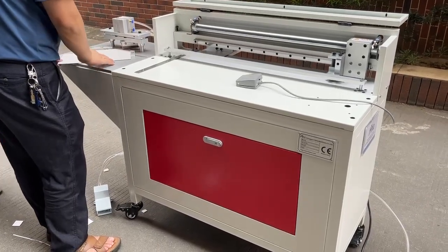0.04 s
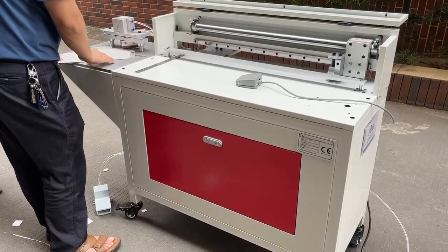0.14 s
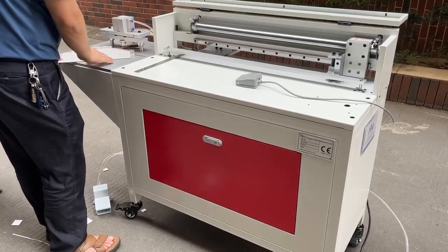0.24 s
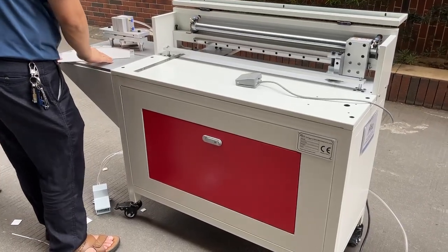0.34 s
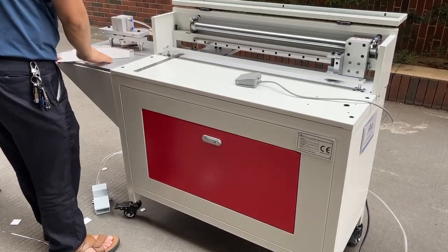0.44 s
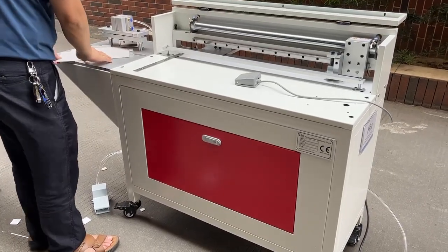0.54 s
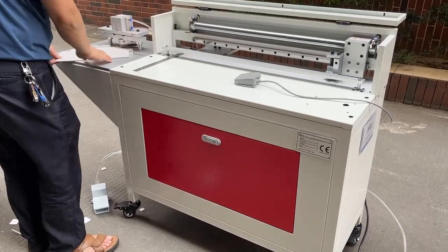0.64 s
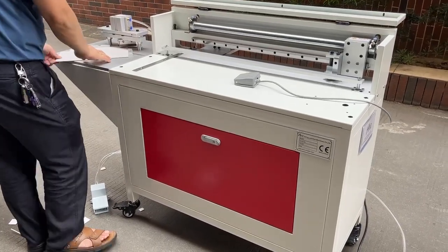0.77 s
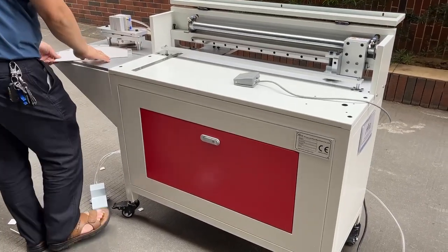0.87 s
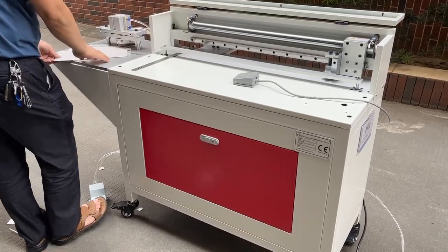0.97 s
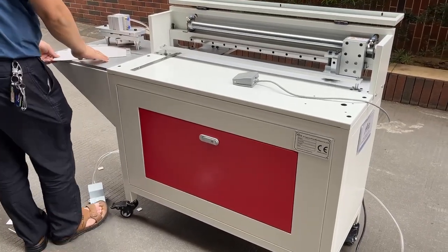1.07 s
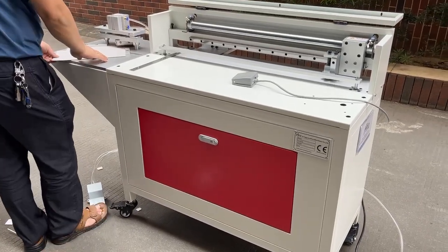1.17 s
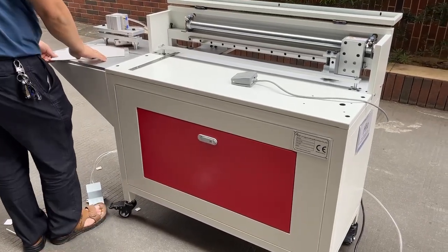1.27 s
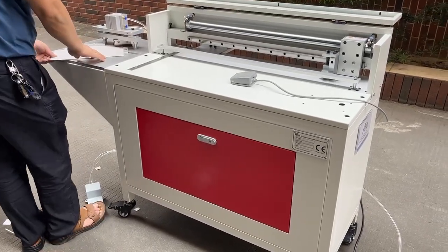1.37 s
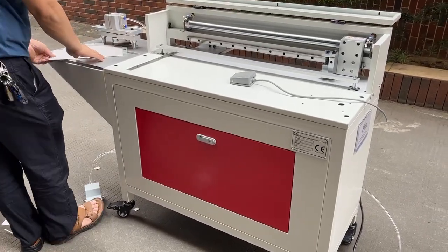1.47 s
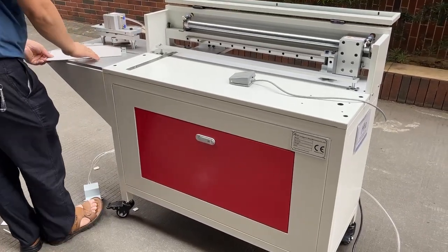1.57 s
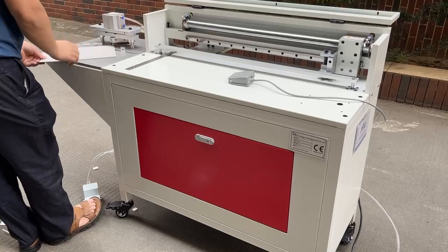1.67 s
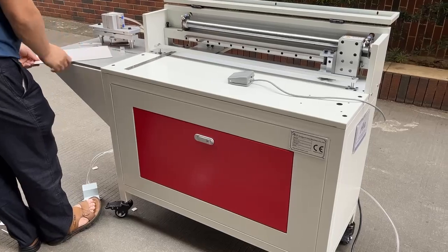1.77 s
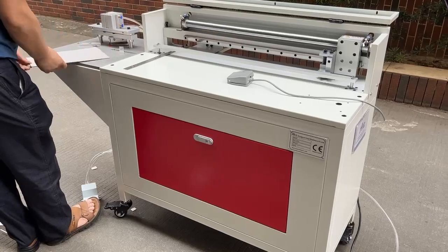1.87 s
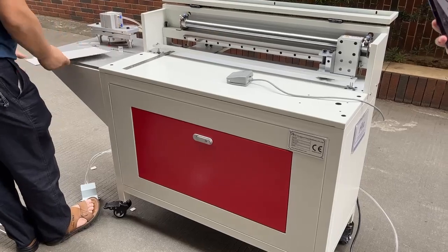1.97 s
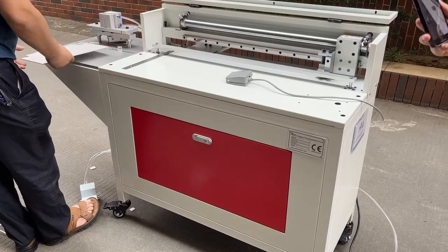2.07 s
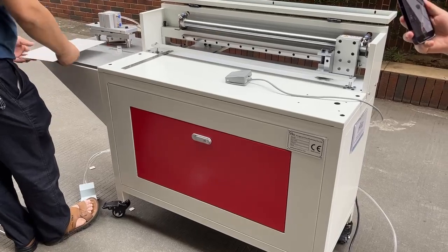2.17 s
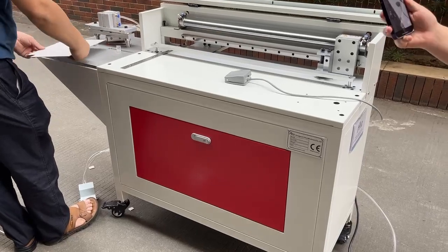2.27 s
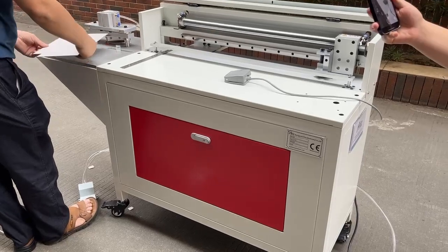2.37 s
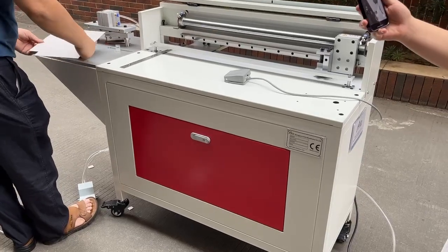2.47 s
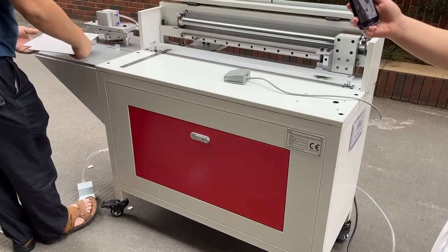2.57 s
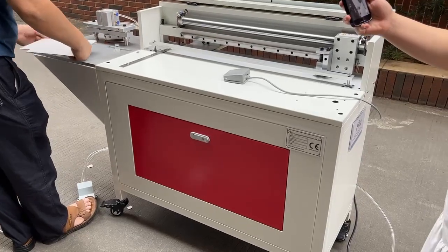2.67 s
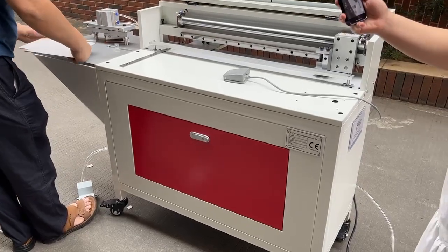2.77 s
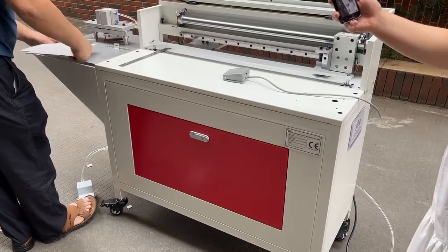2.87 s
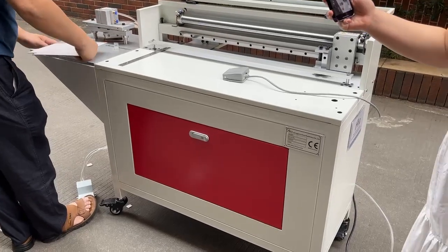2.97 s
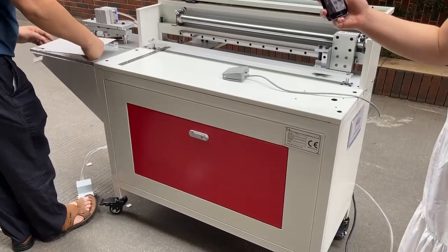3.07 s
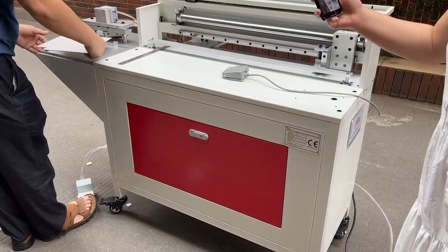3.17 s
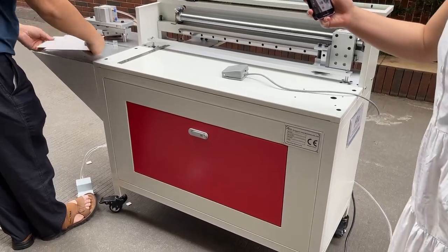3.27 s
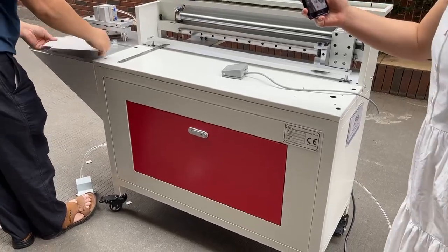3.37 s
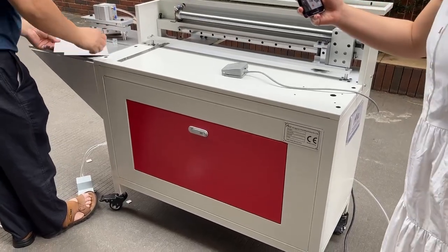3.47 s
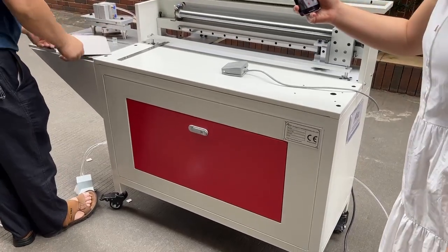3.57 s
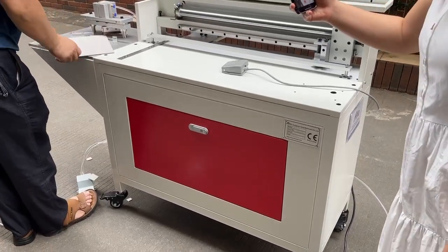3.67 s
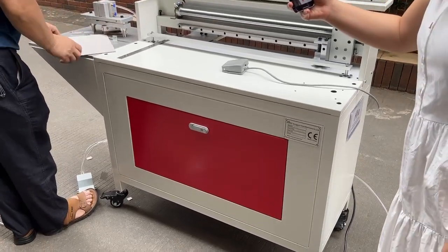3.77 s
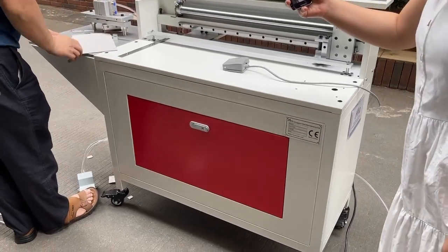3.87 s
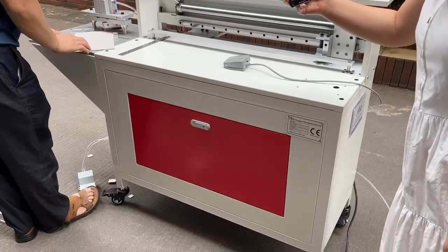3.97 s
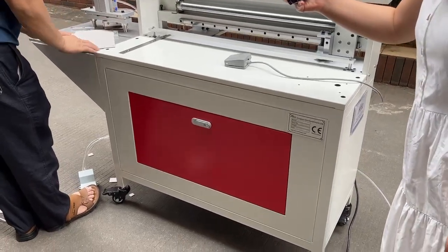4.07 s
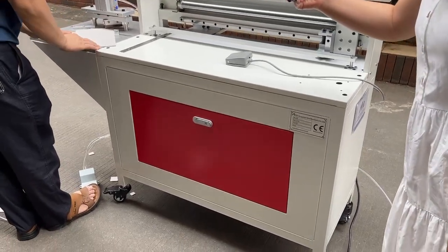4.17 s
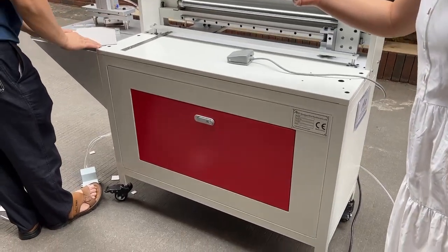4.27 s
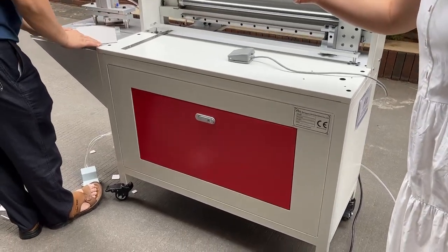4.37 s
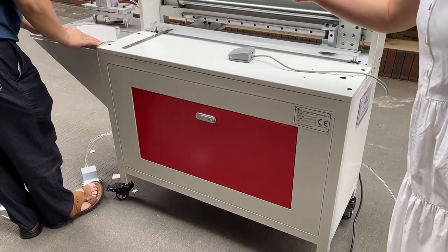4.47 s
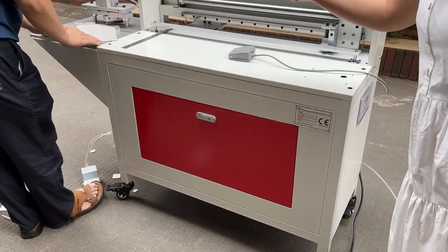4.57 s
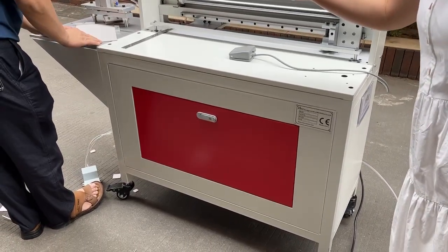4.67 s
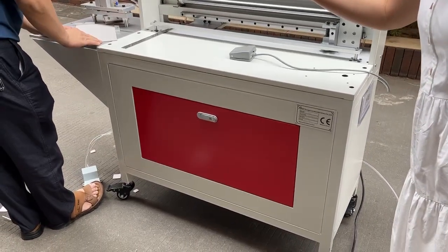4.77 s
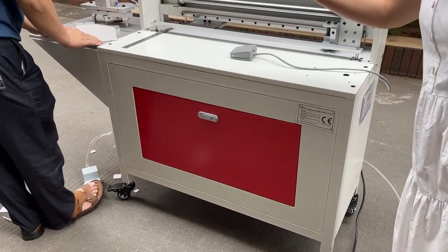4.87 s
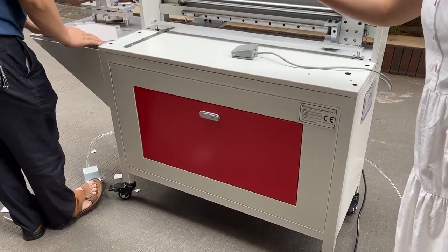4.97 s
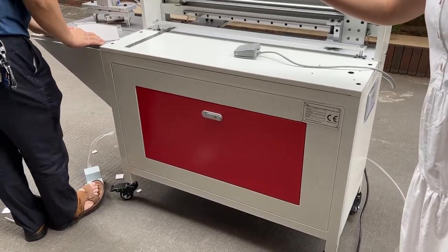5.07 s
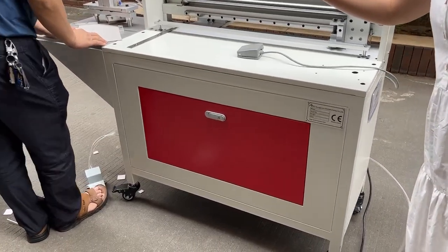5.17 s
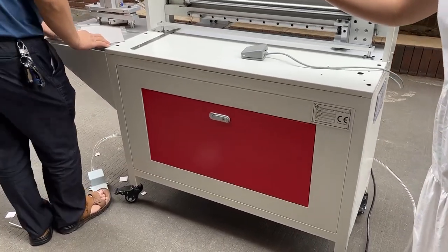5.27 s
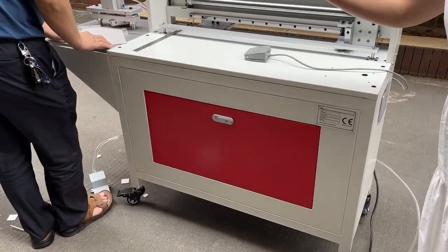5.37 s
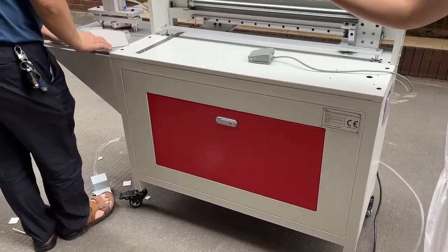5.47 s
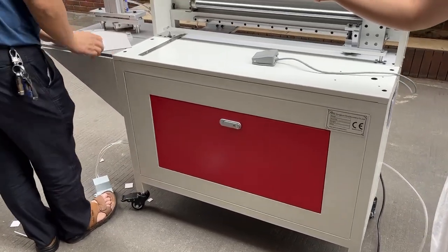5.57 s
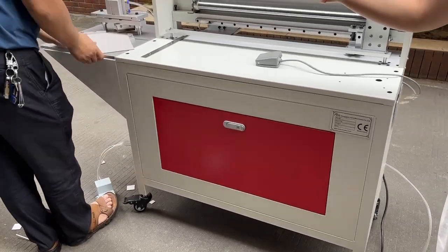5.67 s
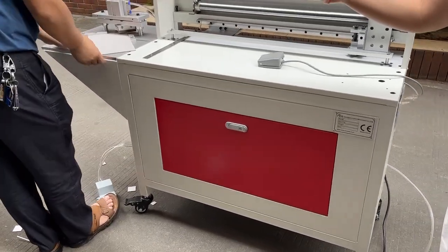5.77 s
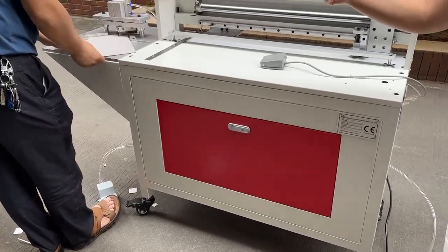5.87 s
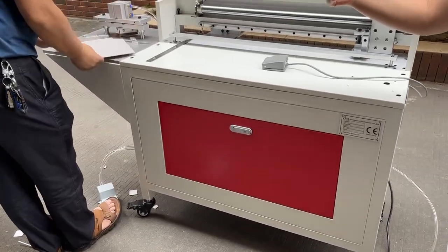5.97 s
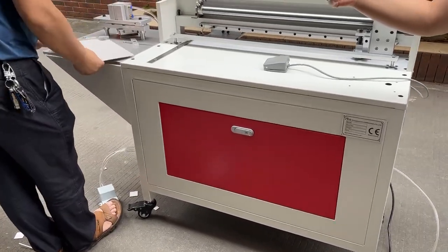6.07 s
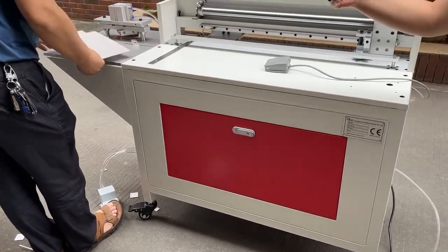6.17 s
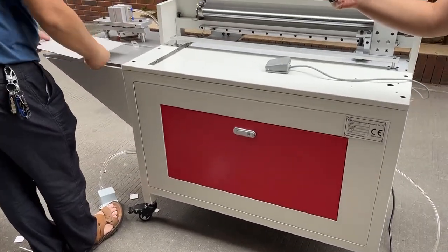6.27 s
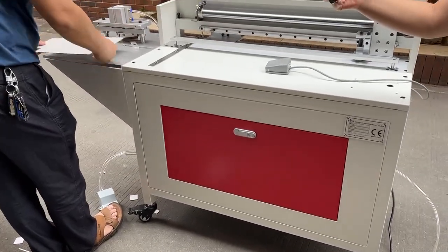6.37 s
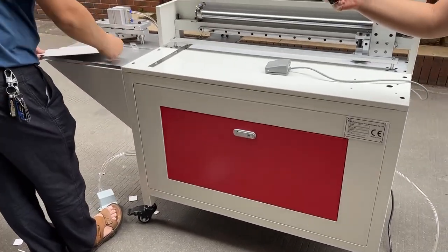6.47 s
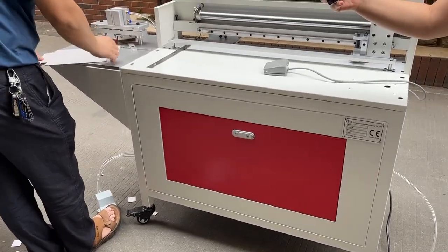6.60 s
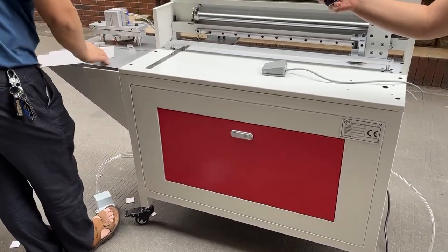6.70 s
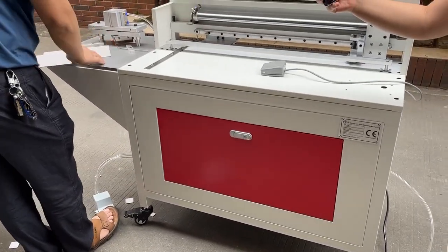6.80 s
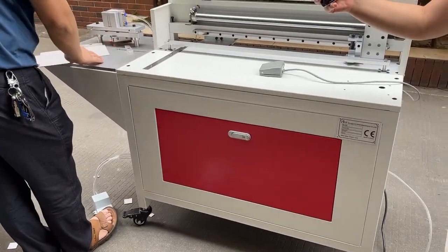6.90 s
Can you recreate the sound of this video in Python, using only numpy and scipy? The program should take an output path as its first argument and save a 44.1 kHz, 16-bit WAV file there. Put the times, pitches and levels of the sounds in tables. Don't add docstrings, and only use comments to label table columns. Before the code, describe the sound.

Over a steady beating compressor hum and airy fan, a pneumatic cutter makes two strokes: puff, dull thud, hiss, then a sharp loud metal clank.

```python
import sys
import numpy as np
from scipy import signal
from scipy.fft import rfft, irfft, next_fast_len
from scipy.io import wavfile
from scipy.ndimage import uniform_filter1d, map_coordinates

SR = 44100
rng = np.random.default_rng(int(sys.argv[2]) if len(sys.argv) > 2 else 0)


def dump_mix(stems):
    frames = np.atleast_2d(stems).T
    limited = np.clip(frames, -1, 1)
    pcm = np.round(limited * 32767).astype(np.int16)
    wavfile.write(sys.argv[1], SR, pcm)


def volts_from_decibels(level):
    exponent = np.asarray(level, float) / 20
    return 10 ** exponent


N = 306054
TIME = np.arange(N) / SR

# crank speed in Hz, crank angle in turns at 3.5 s.
HEADS = [(23.5775, 0), (23.7041, .815), (23.7767, .629), (23.8183, .79)]
HEAD_DB = [0, 0, 0, -1]
HEAD_TILT_DB = [-2.1, 0.55, 0.79, 0.85]
# crank order, level in dB.
STROKE_ORDERS = [(2, -60.5), (4, -57.5), (6, -49.5), (7, -66.5), (8, -56), (9, -59), (10, -65.5),
                 (13, -67.5), (15, -66.5)]
# crank order, level in dB.
WHINE_ORDERS = [(19, -55), (37, -62), (39, -69.5), (41, -60.5), (43, -61), (45, -62.5)]
# frequency in Hz, density in dB per Hz.
ROAR_SPECTRUM = [(25, -23), (45, 3), (100, -3.5), (250, -9), (450, -8.5), (600, -11), (780, -11.5),
                 (1100, -12), (1700, -15), (2100, -23.5), (8000, -93)]
# frequency in Hz, width in Hz, lift in dB.
CASING_MODES = [(451, 13, 5), (565, 22, 8.5), (960, 56, 3.5)]
# frequency in Hz, density in dB per Hz.
FAN_SPECTRUM = [(1200, -30), (2000, -7.5), (2700, 0), (4100, -4), (4800, -3.5), (5800, -6.5), (6900, -10),
                (8200, -10), (10300, -18), (11700, -19), (12000, -68)]
# frequency in Hz, width in Hz, lift in dB.
COWL_MODES = [(2550, 86, 1), (3260, 64, 3), (5210, 550, 1.5), (5520, 250, 2)]
# time in seconds, compressor gain in dB.
NEARNESS = [(0, 1.5), (.6, 1.5), (1.5, 2.5), (3.5, 0.5), (5.8, 2), (6.94, -0.5)]
# peak in seconds, level in dB, colour in Hz, length in seconds.
TICKS = [(0.106, -39, 990, 0.01), (0.553, -45, 2990, 0.012), (2.08, -61, 1020, 0.0077),
         (2.698, -36.5, 2780, 0.012), (3.485, -35.5, 1370, 0.012), (5.484, -41, 1750, 0.01),
         (6.5227, -24, 2850, 0.0067)]
# start in seconds, level in dB, drain time factor, treble tilt in dB per octave.
PEDAL = [
    (1.038, -0.5, 0.92, 1),
    (1.4214, 1.1, 0.67, -0.3),
    (5.119, -2, 0.97, 1),
    (5.538, -0.6, 1.4, -1.6),
]
# delay in seconds, rms in dB, rise in seconds, hold in seconds, t60 in seconds.
FILL_JETS = [
    (0, -26.5, 0.0084, 0.018, 0.084),
    (0.041, -23.5, 0.018, 0.011, 0.089),
]
# delay in seconds, rms in dB, rise in seconds, hold in seconds, t60 in seconds.
VENT_JETS = [
    (-.009, -23.5, 0.011, 0.036, 0.2),
    (0, -18.5, 0.012, 0.0018, 0.17),
]
# frequency in Hz, density in dB per Hz.
JET_SPECTRUM = [(300, -28), (900, -9.5), (1600, -9), (2900, -8.5), (4300, -6.5), (5600, -11.5),
                (6500, -9.5), (7300, -8.5), (8800, -7), (10000, -7), (11500, -13.5), (12450, -71)]
# frequency in Hz, t60 in seconds.
YARD_DECAY = [(300, 0.41), (1500, 1), (4000, 0.5), (10000, 0.37)]
# start in seconds, peak in dB, knock
# in Hz, ring length factor, knock over ring in dB.
BLOWS = [(1.097, -22, 1850, 1.1, -4), (1.118, -19, 281, 0.66, 2), (1.146, -26.5, 207, 0.63, 6.5),
         (1.185, -22, 215, 1.2, -2.5), (1.208, -35, 560, 1.5, -2), (1.48, -16, 1760, 0.15, 3),
         (1.4869, -8, 1685, 1.7, 12.5), (1.488, -13.5, 570, 0.19, 7.5), (5.125, -26, 1120, 1.6, 10),
         (5.197, -20.5, 280, 1.15, 5.5), (5.272, -16.5, 1110, 0.84, 1), (5.611, -6, 2060, 1.67, 2),
         (5.6146, -9, 3260, 0.25, 5), (5.754, -48, 1290, .46, -9), (6.524, -34.5, 1110, .1, 13),
         (1.4899, -16.5, 3200, 0.31, 9)]
# frequency in Hz, level in dB, t60 in seconds.
STEEL_MODES = [(188.2, -4.5, 0.48), (269, 0, 0.2), (362.7, -7, 0.73), (435, -3, 0.33), (547, -15.5, 0.96),
               (610, 3, 0.059), (670, -8, 0.046), (800, -21, 0.18), (946, 8.5, 0.093), (1150, 0.5, 0.18),
               (1370, -5, 0.35), (1710, 15.5, 0.063), (1844, 2.5, 0.27), (2050, 10, 0.14),
               (2740, 16, 0.065), (2745, 2, 0.17), (3030, -30, .12)]
# frequency in Hz, t60 in seconds.
RATTLE_DECAY = [(80, 0.89), (250, 1), (600, 0.24), (1500, 0.61), (3000, 0.5), (6000, 0.11), (11000, .3)]
# start in seconds, length in seconds, rms in dB, t60 in seconds.
CUTS = [
    (1.125, 0.14, -37, 1),
    (5.17, 0.18, -39.5, 0.89),
    (1.497, 0.031, -29.5, 0.6),
    (5.63, 0.027, -38.5, 1),
]
# peak in seconds, level in dB, pitch in Hz, half length in seconds.
BOOMS = [(1.161, -29, 73.5, 0.024), (1.24, -20.5, 90.6, 0.057), (1.409, -36, 97, 0.045),
         (1.553, -27.5, 84, 0.034), (1.716, -27, 100.4, 0.094), (5.26, -22, 87, 0.015),
         (5.328, -21, 92.5, 0.042), (5.673, -16.5, 79.6, 0.019), (5.734, -23.5, 88.7, 0.031),
         (5.827, -29.5, 93, 0.023)]
# frequency in Hz, likeness from 0 to 1, left over right in dB.
NEAR_PORTS = [(250, 1, 0.6), (1000, 0.42, 6), (1590, 0.7, -3.5), (1900, 0.8, 3), (3200, 0.45, 3),
              (5350, 0.1, 4), (7960, 1, -1.2), (11500, 0.87, 1)]
# frequency in Hz, likeness from 0 to 1, left over right in dB.
FAR_PORTS = [(120, 1, 0), (402, 0.55, 3), (960, 0.069, 0), (1540, 0.17, -4.5), (1870, 0.71, 0.5),
             (3200, 0.47, 0.5), (5320, 0.15, 7), (8210, 0.79, -1.7)]
# frequency in Hz, lead of right in radians.
PORT_LEAD = [(0, 0), (1000, -.8), (1600, -1.7), (1900, -.3), (5200, -.8), (7600, 3), (9000, 3.3),
             (10900, 2 * np.pi)]
# frequency in Hz, power share of the band mean.
FAINT_SHARE = [(500, 0), (1500, .25), (5000, .15), (7000, .8), (10000, 1.2)]

SHAFT_HZ, MAINS_HZ, MAINS_DB = 23.72, 101.6, -60
ROAR_DB, FAN_DB, FAN_FOLLOWS_NEARNESS = -42.5, -44, 0.23
HARD_HZ_PER_KNOCK_HZ = 1.98
MURMUR_DB, MURMUR_T60_S, MURMUR_WIDTH_HZ = -14, 2.2, 65


def unit(x):
    return x / np.sqrt(np.mean(x ** 2) + 1e-20)


def along(points, hz):
    f, v = np.transpose(points)
    return np.interp(np.log(hz + 1), np.log(f + 1), v)


def wobble(rate_hz):
    coarse_s = TIME[::64]
    knots = rng.standard_normal(int(N * rate_hz / SR) + 4)
    return np.interp(TIME, coarse_s, map_coordinates(knots, [coarse_s * rate_hz]))


def filtered(x, response):
    m = next_fast_len(x.shape[-1] + 8192)
    return irfft(rfft(x, m) * response(np.fft.rfftfreq(m, 1 / SR)), m)[..., :x.shape[-1]]


def add_at(out, sound, start_s):
    i = round(start_s * SR)
    out[..., i:i + sound.shape[-1]] += sound


def patches(shape, bands, frames):
    field = uniform_filter1d(rng.standard_normal(shape), size=bands, axis=0)
    return unit(uniform_filter1d(field, size=frames, axis=1))


def rush(spectrum, peaks, patchy_db):
    z = signal.stft(rng.standard_normal((2, N)), nperseg=512)[2]
    gain = volts_from_decibels(patchy_db * patches(z.shape[1:], 5, 12))
    pair = signal.istft(z * gain, nperseg=512)[1][:, :N]

    def colour(hz):
        lift_db = sum(db / (1 + ((hz - c) / w) ** 2) for c, w, db in peaks)
        return volts_from_decibels(along(spectrum, hz) + lift_db)
    return unit(filtered(pair, colour))


def dying(decays, seconds, patchy_db):
    n = round(seconds * SR)
    hz, t, z = signal.stft(rng.standard_normal((2, n)), SR, nperseg=256)
    gain_db = patchy_db * patches(z.shape[1:], 2, 6) - 60 * t / along(decays, hz)[:, None]
    return signal.istft(z * volts_from_decibels(gain_db), SR, nperseg=256)[1][:, :n]


def compressor():
    head_hz, turns = np.transpose(HEADS)[:, :, None]
    spin = np.exp(2j * np.pi * (head_hz * (TIME - 3.5) + turns))
    hum = np.sqrt(2) * volts_from_decibels(MAINS_DB) * np.sin(2 * np.pi * MAINS_HZ * TIME)
    for order, db in STROKE_ORDERS:
        head_gain = volts_from_decibels(np.add(HEAD_DB, np.multiply(HEAD_TILT_DB, np.clip(order, 6, 9) - 7)))
        path = np.sqrt(2) * np.exp(2j * np.pi * rng.random((2, 1)))
        hum = hum + volts_from_decibels(db) * (path * (head_gain @ spin ** order)).imag

    crank = 2 * np.pi * np.cumsum(SHAFT_HZ * (1 + 0.00391 * wobble(7))) / SR
    for order, db in WHINE_ORDERS:
        phase = rng.uniform(0, 2 * np.pi, (2, 1))
        hum = hum + volts_from_decibels(db + 2.4 * wobble(9)) * np.sqrt(2) * np.sin(order * crank + phase)

    near_db = np.interp(TIME, *np.transpose(NEARNESS))
    pulse_db = 0.35 * spin.sum(axis=0).imag + 0.55 * (spin ** 2).sum(axis=0).imag
    roar = volts_from_decibels(ROAR_DB + near_db + pulse_db) * rush(ROAR_SPECTRUM, CASING_MODES, patchy_db=1.0)
    fan_db = FAN_DB + FAN_FOLLOWS_NEARNESS * near_db + 0.087 * wobble(12)
    return hum + roar + volts_from_decibels(fan_db) * rush(FAN_SPECTRUM, COWL_MODES, patchy_db=1.3)


def ticks():
    out, t = np.zeros((2, N + SR)), np.arange(SR // 10) / SR
    for s, db, hz, length_s in TICKS:
        def colour(f):
            return 1j * f * hz / (hz * hz - f * f + 1j * f * hz * 0.63) / (1 + (f / 7000) ** 6)
        shape = t / length_s * np.exp(-2.5 * t / length_s) + volts_from_decibels(-16 - 60 * t / 0.16)
        scrape = unit(filtered(rng.standard_normal((2, len(t))), colour))
        add_at(out, volts_from_decibels(db + 7.5) * shape * scrape, s - 0.003)
    return out[:, :N]


def air_jet(t, tilt_db):
    eddies_db = 3 * rng.standard_normal(100)

    def colour(hz):
        tilt = tilt_db * np.log2(hz / 4000 + 0.01)
        return volts_from_decibels(along(JET_SPECTRUM, hz) + tilt + np.interp(hz / 260, np.arange(100), eddies_db))
    return unit(filtered(rng.standard_normal((2, len(t))), colour))


def valve():
    out, t = np.zeros((2, N + SR)), np.arange(SR // 4) / SR
    for (pedal_s, pedal_db, drain, tilt_db), jets in zip(PEDAL, [FILL_JETS, VENT_JETS] * 2):
        for after_s, jet_db, rise_s, hold_s, t60_s in jets:
            start_s = pedal_s + after_s
            flutter_db = 0.85 * np.interp(t * 160, np.arange(len(t)), rng.standard_normal(len(t)))
            drain_db = -60 * np.maximum(t - rise_s - hold_s, 0) / (t60_s * drain)
            level = volts_from_decibels(pedal_db + jet_db + drain_db + flutter_db) * np.minimum(t / rise_s, 1) ** 1.4
            jet = air_jet(t, tilt_db) * level
            add_at(out, jet, start_s)

            walls = dying(YARD_DECAY, 0.6, patchy_db=2.5)
            echo = signal.fftconvolve(jet, walls / np.linalg.norm(walls[0]), axes=1)
            add_at(out, volts_from_decibels(-5) * echo, start_s + 0.012)
    return out[:, :N]


def blows():
    out, t = np.zeros((2, N + SR)), np.arange(SR * 5 // 8) / SR
    hz, level_db, t60_s = np.transpose(STEEL_MODES)[:, :, None]
    for s, db, knock_hz, length, knock_db in BLOWS:
        hard_hz = HARD_HZ_PER_KNOCK_HZ * knock_hz
        phase = rng.uniform(0, 2 * np.pi, (2, len(STEEL_MODES), 1)) * [[[0]], [[1]]]
        mode_db = level_db + rng.normal(0, 0.66, hz.shape) - 60 * t / (t60_s * length)
        ring = np.sum(volts_from_decibels(mode_db) * np.sin(2 * np.pi * hz * t + phase), axis=1)
        crack = volts_from_decibels(-60 * t / 0.012) * rng.standard_normal((2, len(t)))
        rattle = dying(np.multiply(RATTLE_DECAY, [1, length]), 5 / 8, patchy_db=1.5)
        body = (volts_from_decibels(-14.5) * ring + volts_from_decibels(14) * crack + volts_from_decibels(2) * rattle) * np.minimum(t / 0.0015, 1)

        def push(f):
            softness = 1 / (1 + 1j * f / hard_hz) ** 2 / (1 + 1j * f / 700)
            low_cut = (1j * f / (75 + 1j * f)) ** 2
            die_plate = 1 + 1.5j * f * 120 / (565 ** 2 - f * f + 1j * f * 120)
            return softness * low_cut * die_plate * np.sqrt(2500 / hard_hz)

        swing = np.sin(2 * np.pi * knock_hz * t + [[0], [1.5]]) * np.minimum(t * knock_hz, 1)
        knock = volts_from_decibels(knock_db - 2.45 * knock_hz * t) * swing
        add_at(out, volts_from_decibels(db) * (filtered(body, push) + knock), s)
    return out[:, :N]


def crunch():
    out, t = np.zeros((2, N + SR)), np.arange(SR // 2) / SR
    size = (2, len(t))

    def table(f):
        modes = [(950, 1800), (1700, 3600), (3000, 310)]  # Hz, width Hz
        return sum(1j * f * w / (c * c - f * f + 1j * f * w) for c, w in modes) / (1 + 1j * f / 4500) ** 3

    for s, length_s, db, t60_s in CUTS:
        hits = rng.random(size) < 2600 / SR
        clicks = hits * rng.standard_normal(size) * volts_from_decibels(rng.exponential(size=size))
        shape = np.minimum(t / 0.0073, 1) * volts_from_decibels(-60 * np.maximum(t - length_s, 0) / t60_s)
        add_at(out, volts_from_decibels(db) * shape * unit(filtered(clicks, table)), s)
    return out[:, :N]


def booms():
    out, t = np.zeros(N + SR), np.arange(-SR // 5, SR // 2) / SR
    for s, db, hz, half_s in BOOMS:
        swing = np.sin(2 * np.pi * hz * t) * np.exp(-np.where(t > 0, 2.6, 0.7) * (t / half_s) ** 2)

        def frame(f):
            return 1 / (1 + ((f - 1.22 * hz) / MURMUR_WIDTH_HZ) ** 4)
        murmur = unit(filtered(rng.standard_normal(len(t)), frame))
        murmur *= np.clip(1 + t / half_s, 0, 1) * volts_from_decibels(MURMUR_DB - 60 * t / MURMUR_T60_S)
        add_at(out, volts_from_decibels(db) * (swing + murmur), s - 0.2)
    return out[:N] * np.array([[1], [0.1]])


def ports(pair, table):
    hz, alike, balance_db = np.transpose(table)
    m = next_fast_len(N + 8192)
    f = np.fft.rfftfreq(m, 1 / SR)
    a, b = rfft(pair, m)
    turn = np.arccos(np.clip(np.interp(f, hz, alike), 0, 1)) / 2
    lead = np.interp(f, *np.transpose(PORT_LEAD))
    half = volts_from_decibels(np.interp(f, hz, balance_db) / 2) * np.exp(-0.5j * lead)
    mid, side = a * np.cos(turn), b * np.sin(turn)
    return irfft(np.array([(mid + side) * half, (mid - side) / half]), m)[:, :N]


def scene():
    cutter = ticks() + valve() + blows() + crunch() + booms()
    return ports(compressor(), FAR_PORTS) + ports(cutter, NEAR_PORTS)


def roll_off(x):
    return signal.sosfilt(signal.butter(12, 12660, fs=SR, output="sos"), x)


def record(dry):
    dry = dry / (1 + np.abs(dry / 0.97) ** 6) ** (1 / 6)
    sum_diff = np.array([dry[0] + dry[1], dry[0] - dry[1]]) / 2
    hz, _, z = signal.stft(sum_diff, SR, nperseg=2048)
    line_power = np.abs(z) ** 2
    bands = np.add.reduceat(line_power, np.arange(0, len(hz), 16), axis=1)
    power = np.repeat(bands, 16, axis=1)[:, :len(hz)] / 16
    treble = power[:, hz > 6500].sum(axis=(0, 1))
    steady = treble < 4 * np.roll(treble, 2)
    buried = (power < volts_from_decibels(-12) * power[::-1]) & (hz[:, None] > 6500)
    faint = line_power < along(FAINT_SHARE, hz)[:, None] * power.max(axis=0)
    kept = z * ~((buried | faint) & steady)
    mid, side = signal.istft(kept, SR, nperseg=2048)[1][:, :N]
    return roll_off(np.array([mid + side, mid - side]))


dry = scene()
out = record(dry)
dump_mix(out)
```